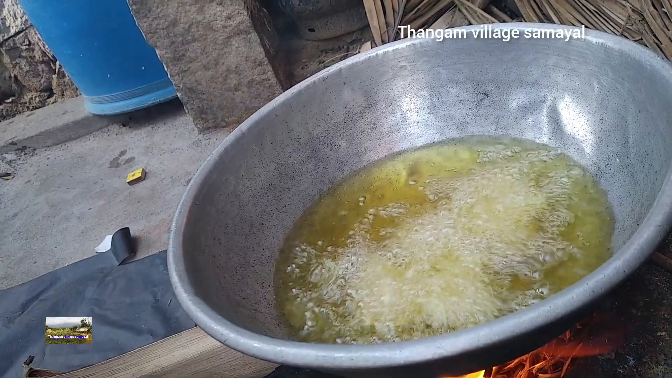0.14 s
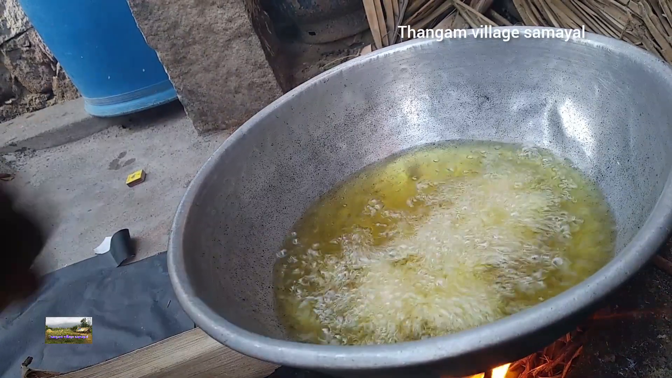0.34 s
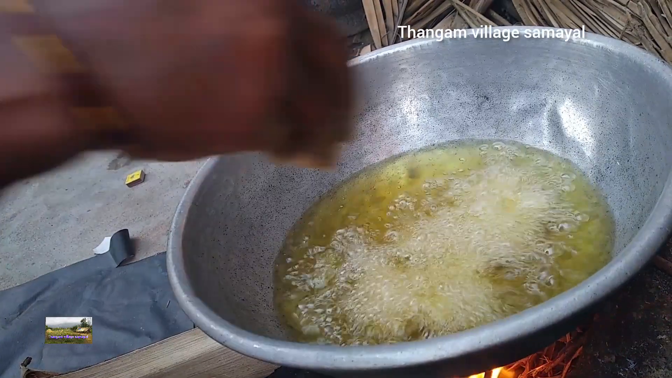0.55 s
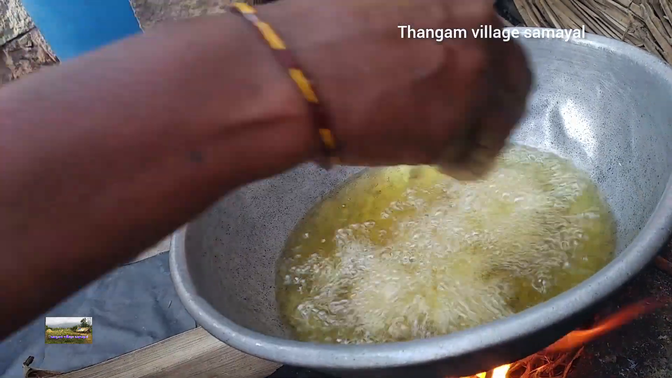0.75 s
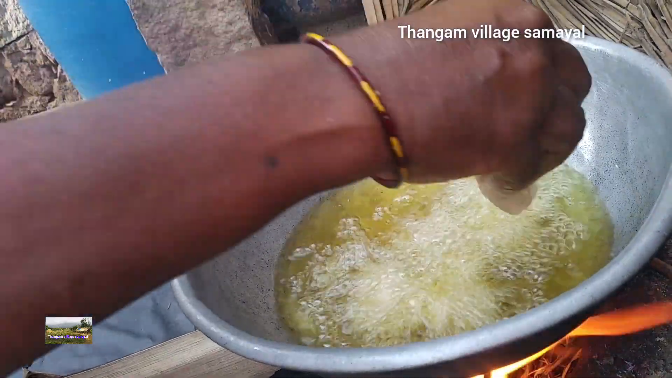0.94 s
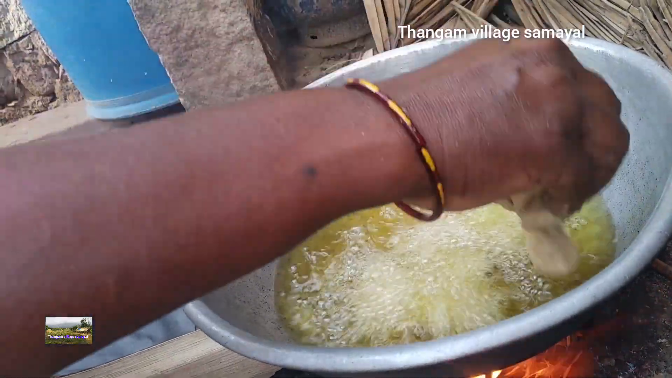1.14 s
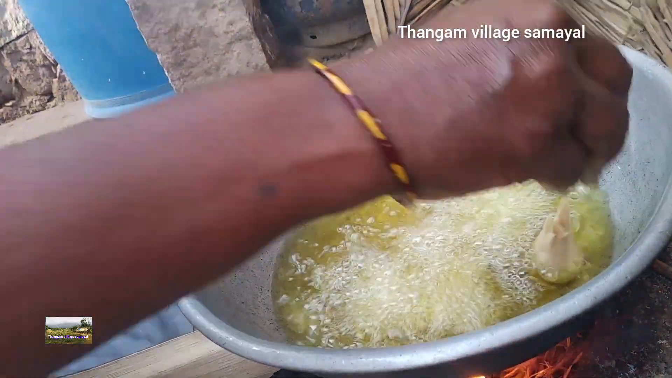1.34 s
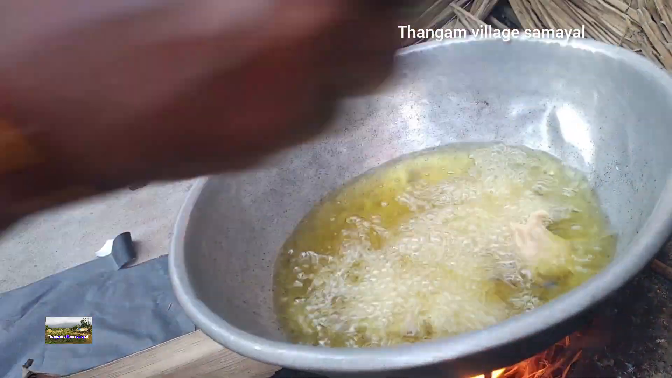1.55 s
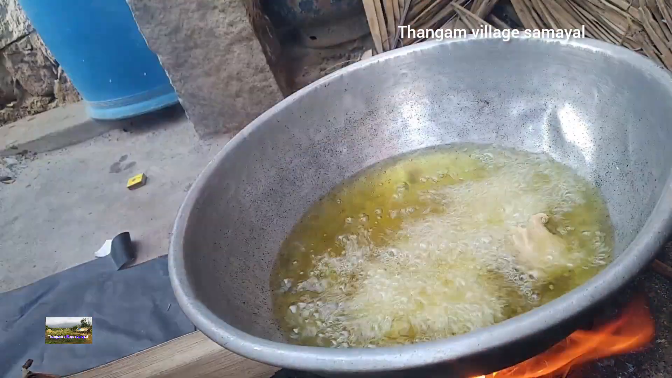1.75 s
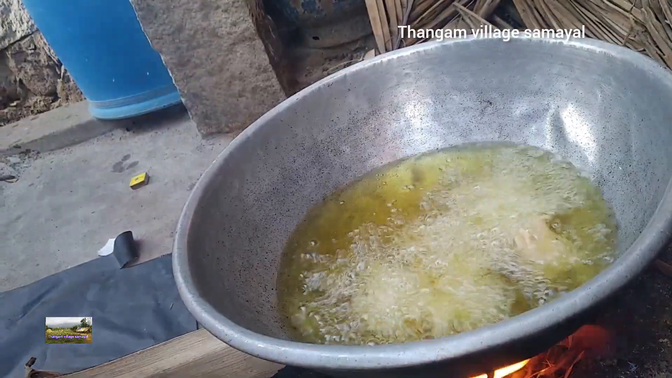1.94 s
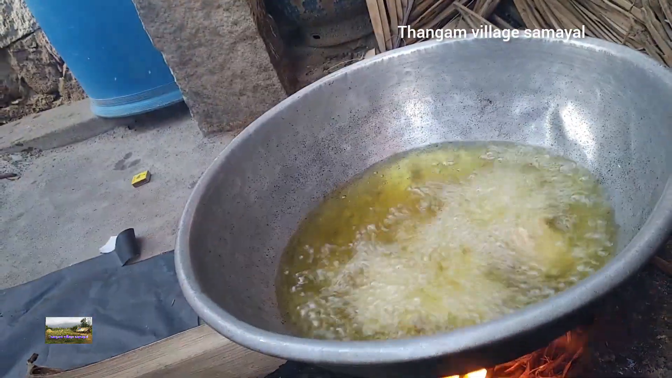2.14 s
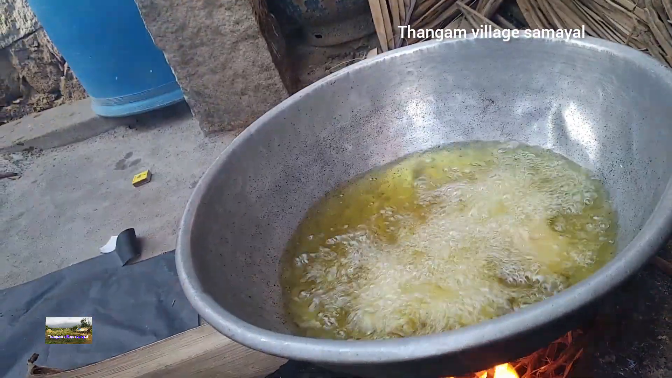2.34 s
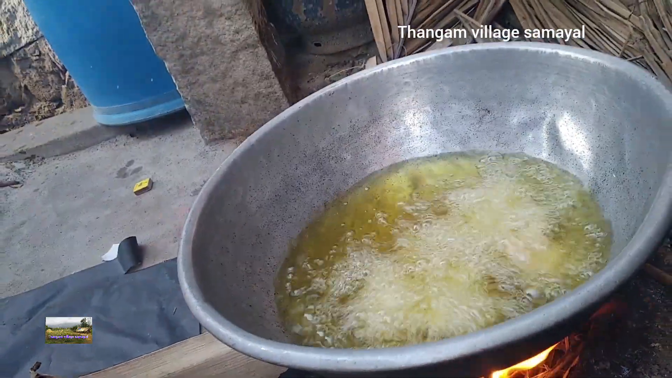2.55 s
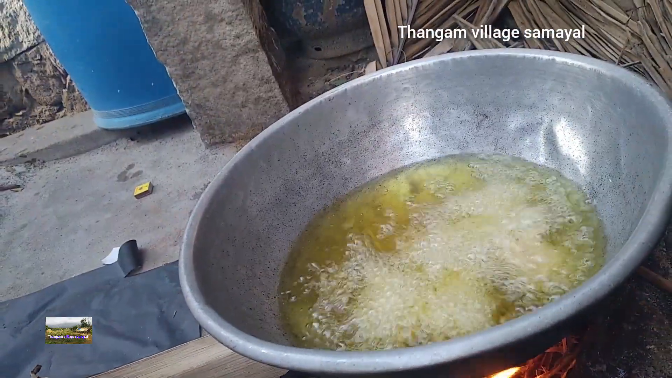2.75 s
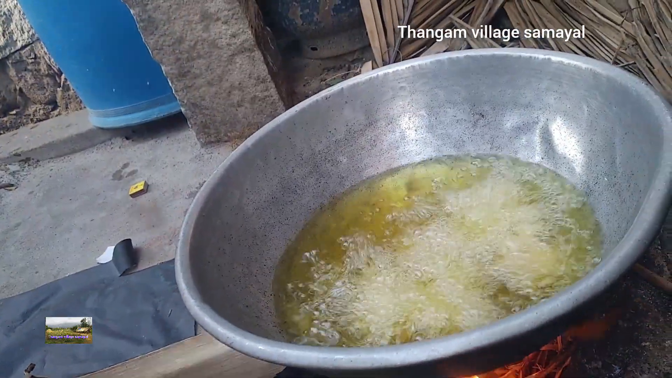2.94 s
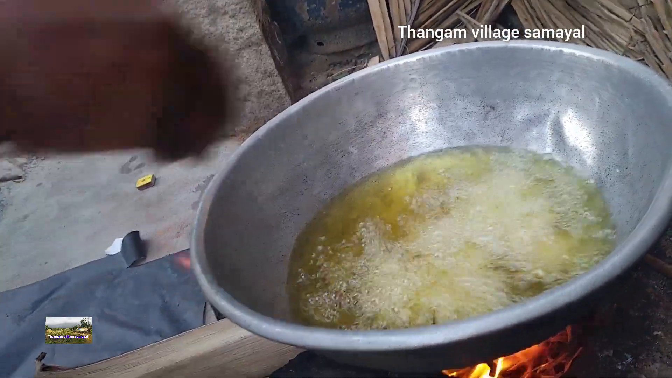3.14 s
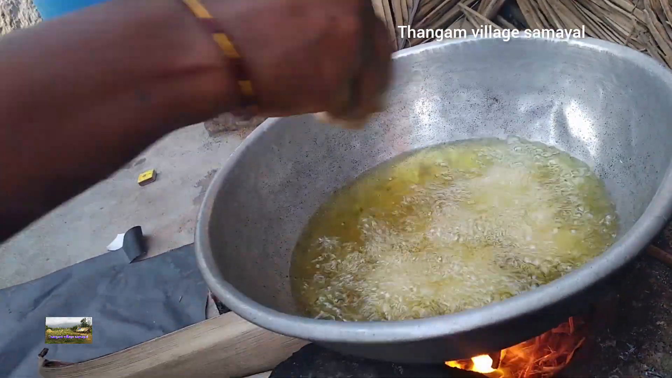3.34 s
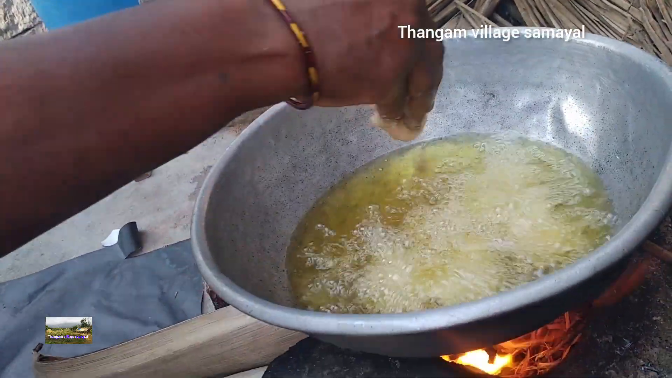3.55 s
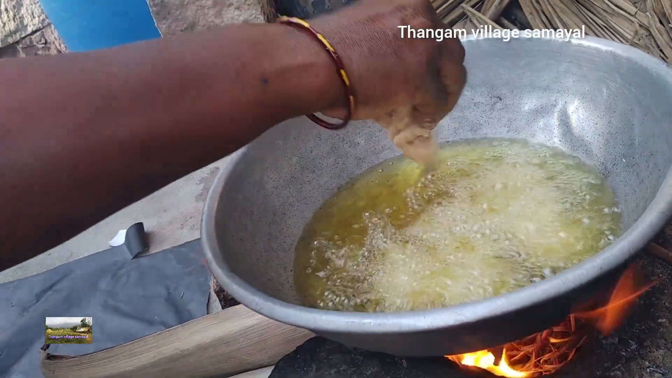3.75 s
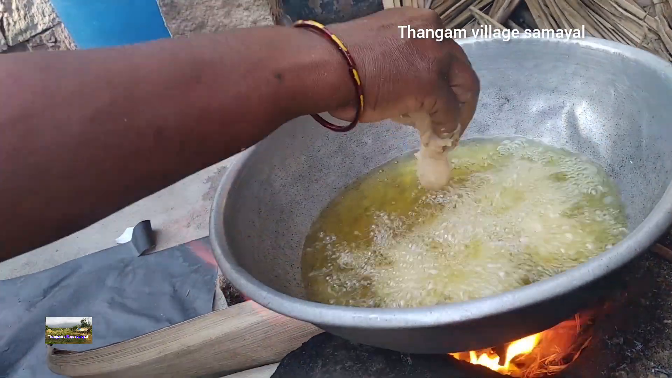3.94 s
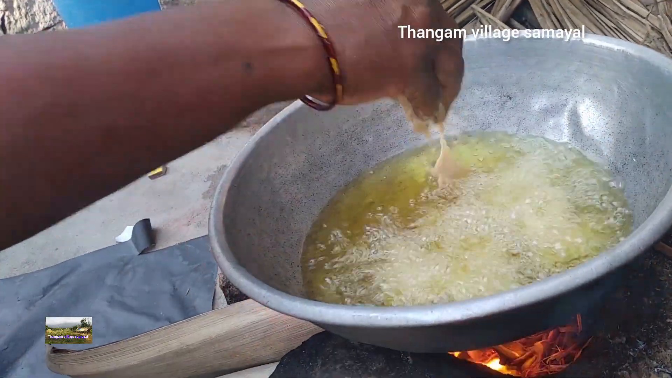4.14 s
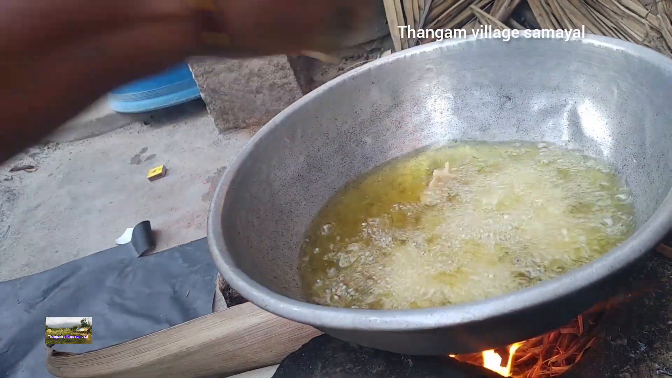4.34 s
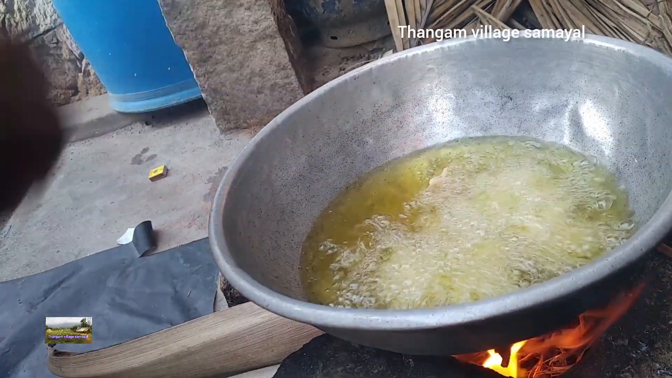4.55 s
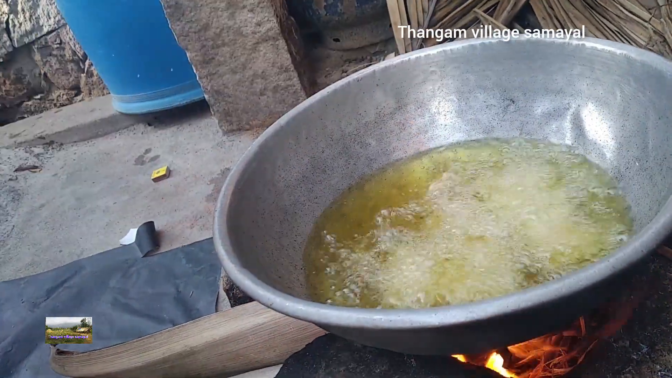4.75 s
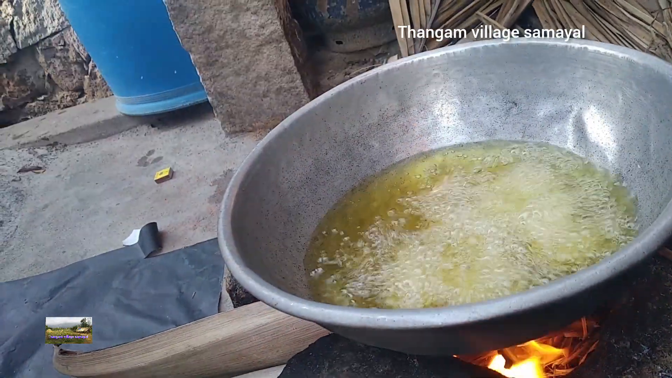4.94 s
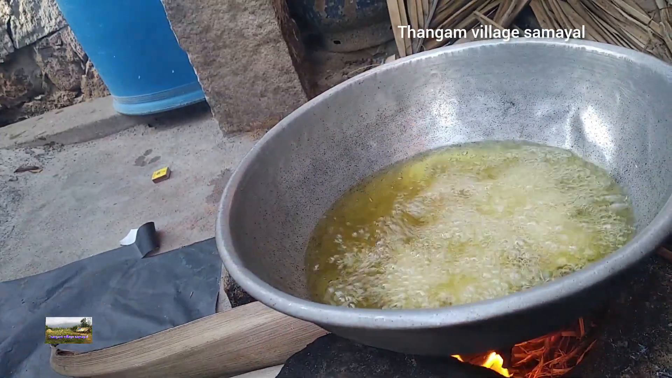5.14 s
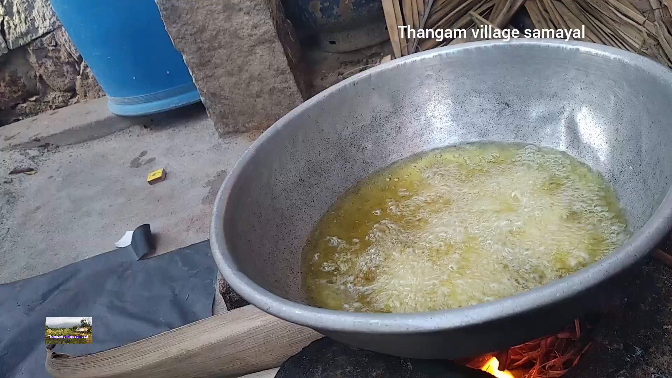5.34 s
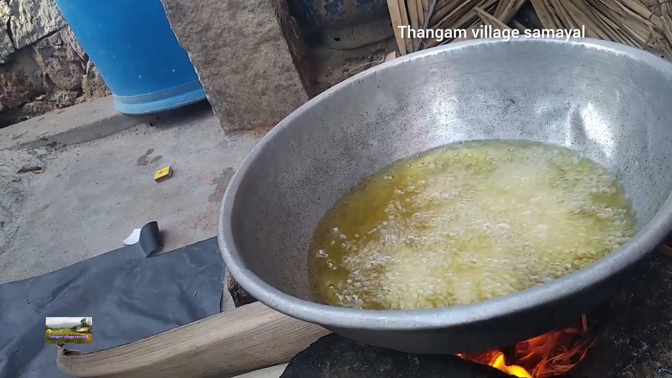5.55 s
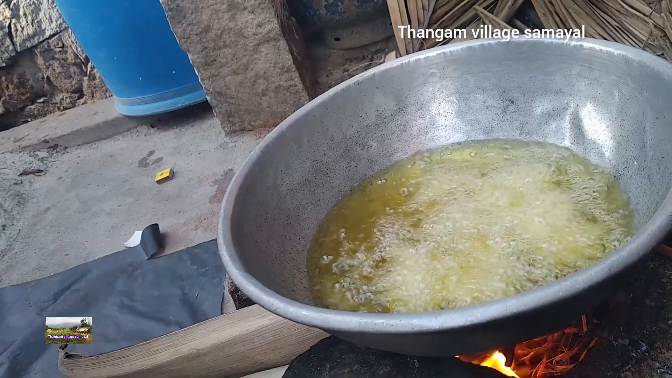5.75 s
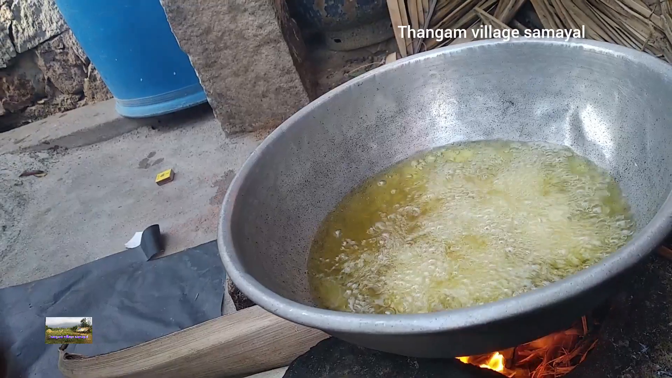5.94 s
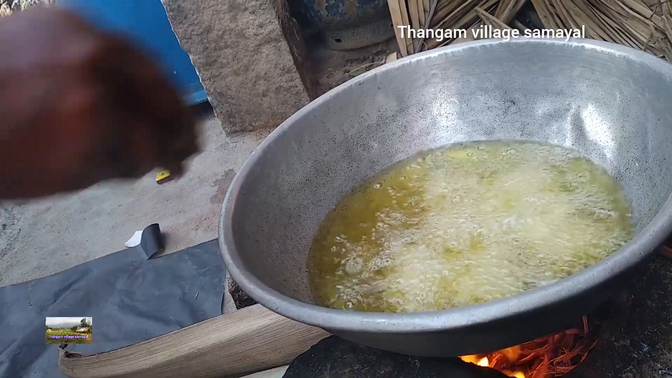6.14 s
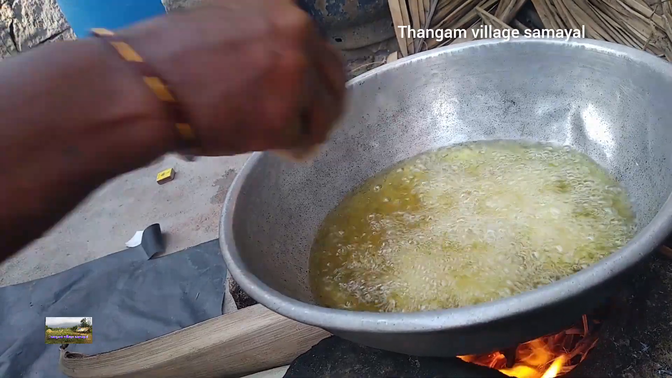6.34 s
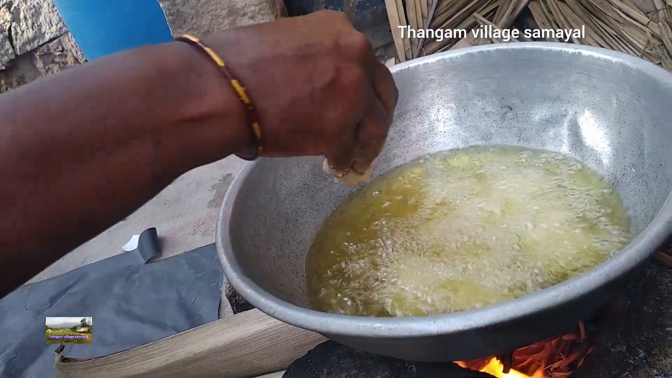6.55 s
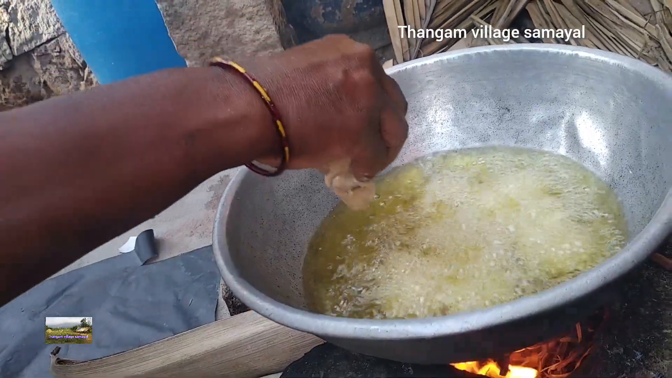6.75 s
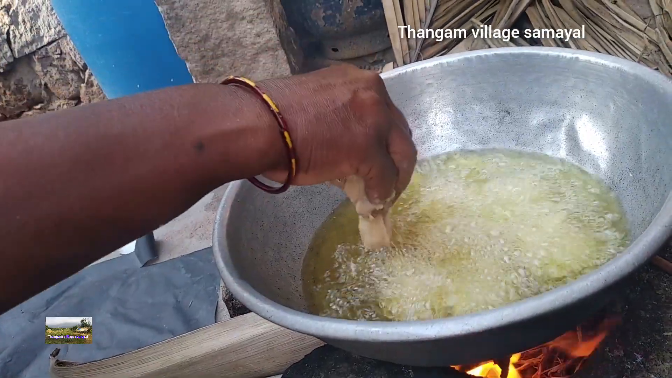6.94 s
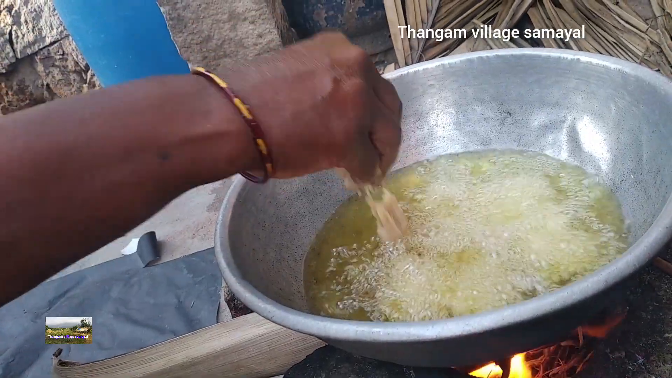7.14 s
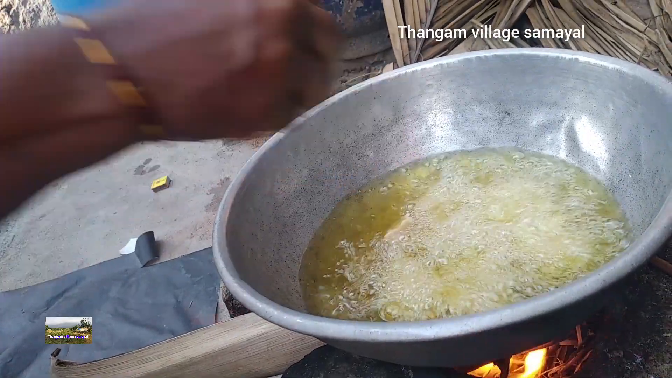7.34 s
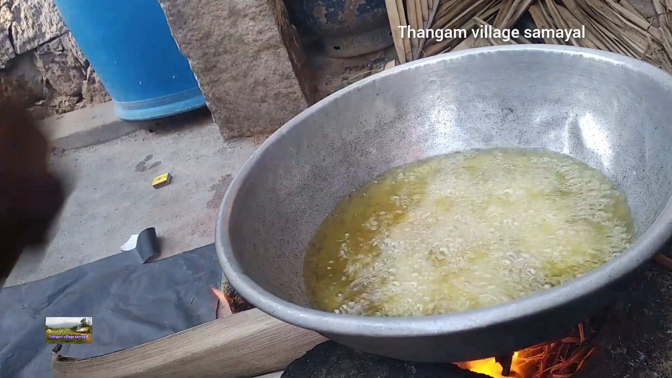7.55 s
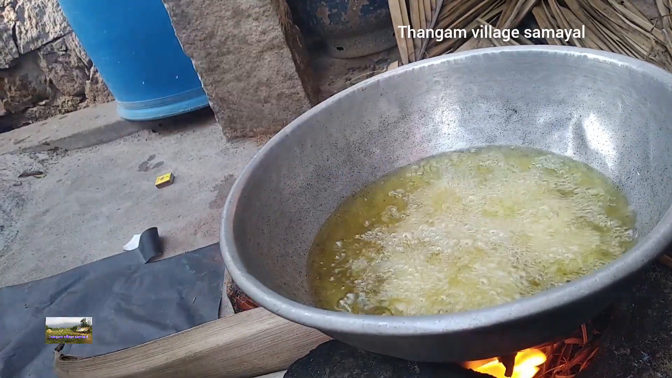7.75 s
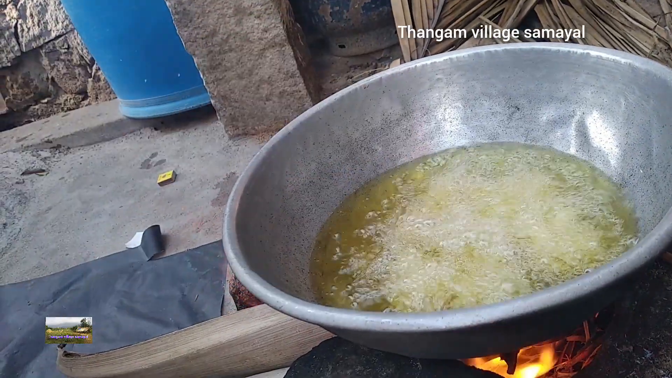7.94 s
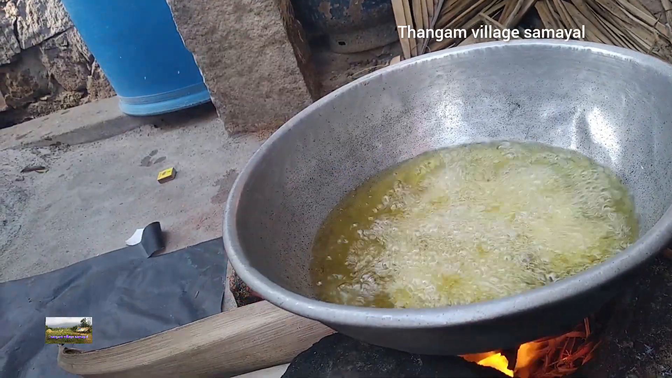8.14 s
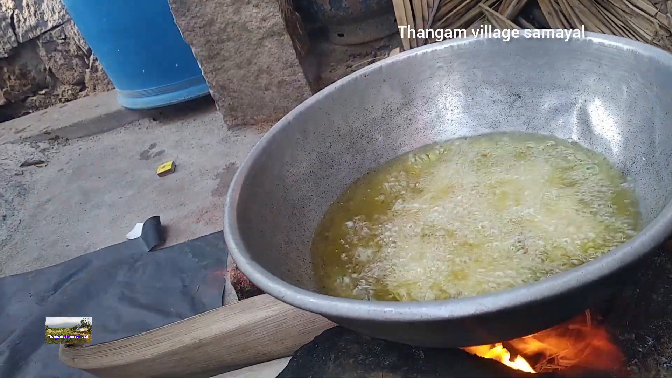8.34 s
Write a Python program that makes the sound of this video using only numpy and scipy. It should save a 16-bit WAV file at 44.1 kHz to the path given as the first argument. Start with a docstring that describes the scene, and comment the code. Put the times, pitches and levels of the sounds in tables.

```python
"""Batter balls deep-fry in a wide aluminium pan over an outdoor wood fire.
From the start: bubble bursts fizz, sizzle and crackle through the pan's resonances; low noise churns and
glugs, plops ring, noise rushes make steam spurts. Then faint sine hums, a far bird's pulsed caw at 0.4 s,
coarser spits, and narrow hisses that glide in pitch. Fresh batter flares at 1.2, 4.1 and 7.2 s, bringing its
own bubbles; from 1.8 s soft noise puffs bump the microphone; at 5.1 s a piece of firewood knocks."""
import sys
import numpy as np
from scipy import signal
from scipy.fft import rfft, irfft, next_fast_len
from scipy.io import wavfile
from scipy.ndimage import map_coordinates

SR = 44100
rng = np.random.default_rng(int(sys.argv[2]) if len(sys.argv) > 2 else 0)


def digitize_waveform(pressure):
    """Quantize a signal to 16-bit integers and store it at the path in sys.argv[1].

    Rows of a 2-D input are taken as channels; values are limited to [-1, 1].
    """
    field = np.atleast_2d(pressure).T
    bounded = np.clip(field, -1, 1)
    quanta = np.round(bounded * 32767).astype(np.int16)
    wavfile.write(sys.argv[1], SR, quanta)


N = 369999
TIME = np.arange(N) / SR
SIZE = next_fast_len(N + SR // 4, real=True) // 2 * 2   # padded FFT length, even
BIN_HZ = np.maximum(np.arange(SIZE // 2 + 1) * SR / SIZE, 1)


def from_db(db):
    """Decibels to gain."""
    return np.exp(np.asarray(db) * (np.log(10) / 20))


def rms_one(x):
    """Scale to rms 1."""
    return x / np.sqrt(np.mean(x ** 2) + 1e-20)


def level_curve(rows):
    """(t/s, level/dB) points interpolated at every sample."""
    s, db = np.transpose(rows)
    return np.interp(TIME, s, db)


def drift(rate_hz):
    """Random wander of spread about 1, with rate_hz new targets a second."""
    targets = rng.standard_normal(4096)
    return 1.2 * np.interp(TIME * rate_hz, np.arange(len(targets)), targets)


def balance(pan_db):
    """Left and right gains, pan_db apart; negative leans right."""
    return from_db([[pan_db / 2], [-pan_db / 2]])


def colour(x, spectrum):
    """Causal (minimum-phase) filter with this spectrum, by folding the cepstrum."""
    hz, db = np.transpose(spectrum)
    log_gain = np.log(from_db(np.interp(np.log(BIN_HZ), np.log(hz), db)))
    cepstrum = irfft(log_gain)
    cepstrum[1:SIZE // 2] *= 2
    cepstrum[SIZE // 2 + 1:] = 0
    response = np.exp(rfft(cepstrum))
    return irfft(rfft(x, SIZE) * response)[..., :N]


# resonances and dips of pan and oil: f/Hz, width/Hz, boost/dB
PAN = [(172,21,12), (443,204,-40), (561.7,24.4,23), (985,67,-28), (1117.4,24.5,18), (1255,16,-17),
       (1348,26,9), (1610,33,11.5), (1822,27.4,14.5), (2132,49,-13), (2144.4,14.4,19.5), (2270,120,-24),
       (2462,21,7.5), (2752,23,12), (3032,12,6), (3210,19,8.5), (3440,27,13), (3790,51,3), (4004,72,13.5),
       (4097,17.6,8.5), (4070,160,3.5), (4550,310,-0.5), (4990,77,7), (5380,31,8.5), (5755,33,12),
       (6185,130,8.5), (6490,45,7), (7170,114,6), (8680,130,5.5), (9260,76,5.5), (9050,66,-0.5),
       (9705,55,5.5), (10900,220,-14.5), (12300,72,-7), (12530,91,3.5)]


def pan_ring(x):
    """Pan and oil lift narrow bands, which ring on briefly, and dip others: a chain of peaking filters."""
    sections = []
    for hz, width_hz, boost_db in PAN:
        a = np.pi * width_hz / SR
        c = -2 * np.cos(2 * np.pi * hz / SR)
        g = from_db(boost_db)
        sections.append(np.array([1 + a * g, c, 1 - a * g, 1 + a, c, 1 - a]) / (1 + a))
    return signal.sosfilt(sections, x + 1e-18)


def place(pair, alike, pan_db):
    """Two unrelated signals become left and right with a given likeness (0 to .99) and balance."""
    side = np.sqrt((1 - alike) / (1 + alike)) * pair[1]
    left, right = from_db(pan_db / 2), from_db(-pan_db / 2)
    return np.array([left * (pair[0] + side), right * (pair[0] - side)]) * 2 / (left + right)


def bursts(per_s, spread_db):
    """Bubbles burst at random instants and sizes, with independent strengths in the two signals."""
    born = rng.random(N) < per_s / SR
    sizes = from_db(spread_db * np.minimum(rng.exponential(1, N), 5))
    return rms_one(born * sizes * rng.standard_normal((2, N)))


def bubbling(spectrum, per_s, spread_db):
    """Random bursts, coloured by bubble size and by the pan."""
    return rms_one(pan_ring(colour(bursts(per_s, spread_db), spectrum)))


def patchy(x, depth_db, rate_hz, lowest_hz, count):
    """Bubbles of like size come in clusters, so each half-octave flickers on its own."""
    out, rest = 0, x
    for hz in np.minimum(lowest_hz * 2 ** (np.arange(count) / 2), SR / np.pi):
        low = signal.sosfiltfilt(signal.butter(4, hz, fs=SR, output="sos"), rest, padtype="even")
        out = out + low * from_db(depth_db * drift(rate_hz))
        rest = rest - low
    return rms_one(out + rest * from_db(depth_db * drift(rate_hz)))


def clumps(depth_db=1.5, rate_hz=170):
    """Gain of bubbles that set each other off, in clumps of a few thousandths of a second."""
    return rms_one(from_db(depth_db * drift(rate_hz)))


def swell(s, length_s):
    """Bell-shaped rise and fall, length_s wide at half power, and the samples it covers."""
    near = slice(max(int((s - 3 * length_s) * SR), 0), int((s + 3 * length_s) * SR))
    return near, 2 ** (-2 * ((TIME[near] - s) / length_s) ** 2)


def rush(grains, s, length_s, hz, band_ratio):
    """A dense rush around one pitch that swells and stops, and the samples it covers."""
    near, bell = swell(s, length_s)
    band = signal.butter(2, [hz / band_ratio, hz * band_ratio], "band", fs=SR, output="sos")
    return near, rms_one(signal.sosfilt(band, grains[:, near])) * bell


def ring(clicks, hz, t60_s):
    """A unit click sets a decaying sine of height about 1 ringing."""
    r, w = from_db(-60 / (t60_s * SR)), 2 * np.pi * hz / SR
    return signal.lfilter([0, np.sin(w)], [1, -2 * r * np.cos(w), r * r], clicks + 1e-18)


def boil_off(s, db, rise_s, fade_db_per_s):
    """Gain of a fresh lump's boiling: it rises as the lump sinks in, then fades as a crust forms."""
    fade_db = fade_db_per_s * np.maximum(TIME - s - rise_s, 0)
    return np.clip((TIME - s) / rise_s, 0, 1) * from_db(db - fade_db)


def hand_shade(lead_s=0.033, over_s=0.38, depth_db=-4.5):
    """Level change/dB as the hand screens the pan just before each lump goes in."""
    db = np.zeros(N)
    for s, *_ in DROPS:
        near, bell = swell(s - lead_s, over_s)
        db[near] += depth_db * bell
    return db


# vigour of the fizzing crusts, before shade and trim: t/s, level/dB
FIZZ = [(0,-50), (.17,-49), (.35,-48.5), (.7,-51), (1.1,-46), (1.42,-44.5), (1.8,-55), (2.27,-55.5),
        (2.48,-45.5), (2.72,-45), (2.97,-47.5), (3.22,-46.5), (3.36,-48), (3.55,-47.5), (3.85,-45.5),
        (4.0,-47), (4.25,-50.5), (4.7,-50), (5.0,-48.5), (5.42,-48.5), (5.62,-46), (5.97,-52), (6.25,-47),
        (6.46,-54), (6.6,-48.5), (6.73,-53.5), (6.88,-46.5), (7.1,-50), (7.35,-50.5), (7.7,-55),
        (8.03,-47.5), (8.2,-53), (8.39,-52.5)]
# fizz spectrum before the pan: f/Hz, relative level/dB per Hz
FIZZ_COLOUR = [(1000,-81), (3000,-27), (5000,-25), (7600,-5), (8600,3.5), (9500,3), (10400,2), (10900,-2),
               (11400,0.5), (12600,-1.5), (14000,-7.5), (15500,-11.5)]
PAN_PER_DB = 0.57   # left-right shift/dB per dB of level: surges move towards the middle


def fizz(trim_db=-0.96, per_s=22000, spread_db=-1.0, patch_db=2.6, alike=0.15,
         usual_db=-54.5, usual_pan_db=-14.5, fresh_pan_db=-1.5):
    """Tiny bubbles burst in clumps on the crusts, and on each fresh lump."""
    db = level_curve(FIZZ) + hand_shade()
    old, new = (patchy(bubbling(FIZZ_COLOUR, per_s, spread_db), patch_db, 65, 5060, count=3)
                for _ in range(2))
    crusts = place(old, alike, usual_pan_db + PAN_PER_DB * (db - usual_db)) * from_db(db)
    fresh_gain = sum(boil_off(s, fine_db, rise_s, fade) for s, _, rise_s, fade, _, fine_db in DROPS)
    fresh = place(new, alike, fresh_pan_db) * fresh_gain
    return (crusts + fresh) * from_db(trim_db) * clumps()


# coarse sizzle of the balls already frying, before shade: t/s, level/dB
WET = [(0,-54), (2.3,-53.5), (3.3,-56), (5.3,-54), (6.8,-56), (8.39,-54.5)]
# its spectrum before the pan: f/Hz, relative level/dB per Hz
WET_COLOUR = [(600,-30), (1500,-32), (2300,-15.5), (3100,-2.5), (3900,-4), (4400,-5), (5000,-5),
              (6000,-5.5), (7300,-4), (9000,-4), (12000,-7.5), (15500,-41)]


def wet_sizzle(per_s=12000, spread_db=0.0, patch_db=3.0, alike=0.29, pan_db=-2):
    """Water boiling out of the balls makes larger, lower bubbles."""
    grains = patchy(bubbling(WET_COLOUR, per_s, spread_db), patch_db, 45, 2730, count=4)
    return place(grains, alike, pan_db) * from_db(level_curve(WET) + hand_shade())


def crackles(trim_db=-11, per_s=900, spread_db=-0.7, ring_cycles=24, lowest_hz=2800, highest_hz=10000,
             tilt_db_per_octave=14.0, fresh_db=-8, alike=0.22, pan_db=-5):
    """Single bubbles open above the fizz, each a short, soft-edged ping at the pitch of its size."""
    clicks, size_class, out = bursts(per_s, spread_db), rng.integers(0, 24, N), 0
    for k, hz in enumerate(np.geomspace(lowest_hz, highest_hz, 24)):
        t60_s = ring_cycles / hz
        pings = ring(ring(clicks * (size_class == k), hz, t60_s), hz, t60_s)   # twice softens the edge
        out = out + rms_one(pings) * from_db(tilt_db_per_octave * np.log2(hz / lowest_hz))
    crusts = from_db(level_curve(FIZZ) + hand_shade())
    fresh = sum(boil_off(s, db + fresh_db, rise_s, fade) for s, db, rise_s, fade, _, _ in DROPS)
    return place(rms_one(pan_ring(out)), alike, pan_db) * (crusts + fresh) * from_db(trim_db)


CHURN_ALIKE, CHURN_PAN_DB = 0.97, -4
# how hard the oil churns: t/s, level/dB
CHURN = [(0,-68), (3.2,-69.5), (4.5,-67), (5.6,-68.5), (6.4,-69.5), (8.39,-68.5)]
# churn spectrum before the pan: f/Hz, relative level/dB per Hz
CHURN_COLOUR = [(30,-48), (60,-44), (100,-16.5), (160,-6.5), (240,0.5), (400,-4), (700,-26), (1000,-15.5),
                (1600,-18), (2500,-10.5), (5000,-39.5)]


def churn(per_s=3000, spread_db=1.16, patch_db=5.0):
    """Big bubbles heave under the surface and set the body of oil murmuring."""
    grains = patchy(bubbling(CHURN_COLOUR, per_s, spread_db), patch_db, 22, 186, count=7)
    return place(grains * from_db(level_curve(CHURN)), CHURN_ALIKE, CHURN_PAN_DB)


def plops(level_db=-78.0, per_s=170, spread_db=1.0, ring_cycles=32, lowest_hz=250, highest_hz=880,
          tilt_db_per_octave=-6.0, pan_db=-9.0):
    """Single large bubbles swell and ring softly under the oil, each at the pitch of its size."""
    clicks, size_class, out = bursts(per_s, spread_db)[0], rng.integers(0, 24, N), 0
    for k, hz in enumerate(np.geomspace(lowest_hz, highest_hz, 24)):
        r, w = np.exp(-np.log(1000) * hz / (ring_cycles * SR)), 2 * np.pi * hz / SR
        resonance = [1, 0, -1, 1, -2 * r * np.cos(w), r * r]
        excitation = clicks * (size_class == k) + 1e-12 * np.sin(w * np.arange(N))   # never quite silent
        tone = signal.sosfilt([resonance, resonance], excitation)   # twice: swells before it decays
        out = out + rms_one(tone) * from_db(tilt_db_per_octave * np.log2(hz / lowest_hz))
    return rms_one(out) * from_db(level_db) * balance(pan_db)


# biggest glugs of the oil: t/s, level/dB, length/s, f/Hz
GLUGS = [(.04,-62,0.078,172), (0.566,-62.5,0.13,175), (0.832,-67.5,0.08,181), (3.487,-62.5,0.072,172),
         (3.917,-62.5,0.076,172), (4.26,-64.5,0.09,178), (4.24,-67.5,0.079,285), (4.507,-66,0.14,290),
         (4.574,-60.5,0.072,173.5), (4.7,-66,0.036,180), (5.533,-65,0.064,179), (5.544,-70,0.093,324),
         (5.53,-71,.07,496), (5.57,-74,0.049,780), (6.678,-64.5,0.047,176), (8.184,-65.5,.095,187)]


def glugs():
    """Louder glugs of the churning oil: narrow low bands of noise swell and stop."""
    white, out = rng.standard_normal((2, N)), np.zeros((2, N))
    for s, db, length_s, hz in GLUGS:
        near, sound = rush(white, s, length_s, hz, band_ratio=1.075)
        out[:, near] += sound * from_db(db)
    return place(out, CHURN_ALIKE, CHURN_PAN_DB)


# strongest steam spurts from the crusts, before trim and pan: t/s, level/dB, length/s, centre f/Hz
SPURTS = [(0.1,-44,0.012,10800), (0.165,-43,0.022,11200), (0.484,-44.5,.01,9650), (0.624,-39.5,0.015,8900),
          (0.792,-43,0.019,11500), (.966,-40,0.01,9600), (1.065,-38,0.015,10900), (1.226,-42.5,0.011,10900),
          (1.36,-43,.014,11200), (1.512,-51,0.016,12600), (1.761,-47.5,0.012,7840),
          (2.216,-46.5,0.0089,9500), (2.35,-52,0.041,9900), (2.416,-40.5,0.02,11500),
          (2.435,-40,0.019,9900), (2.483,-44,0.0076,12600), (2.522,-34.5,0.014,11700),
          (2.553,-38,0.048,9800), (2.66,-37.5,0.044,9300), (2.699,-39,0.011,9300), (2.728,-38,.009,9000),
          (2.752,-34.5,0.026,10500), (2.786,-41,.007,9200), (2.808,-40,0.014,10600), (2.905,-39,0.025,9500),
          (3.043,-42,0.037,9400), (3.153,-49,0.043,9500), (3.239,-39.5,0.02,9700), (3.277,-41.5,0.01,9700),
          (3.439,-41.5,0.017,10800), (3.515,-59,.02,9400), (3.63,-41.5,.018,11100),
          (3.69,-44.5,0.038,10200), (3.846,-51,.012,9700), (4.373,-46.5,0.028,10100),
          (4.408,-47,0.018,11500), (4.552,-43.5,0.028,10200), (4.808,-45,.022,10000),
          (5.074,-37.5,0.012,9800), (5.218,-48,0.013,9500), (5.267,-47,0.0098,9400), (5.4,-44,0.041,9700),
          (5.474,-46,0.0085,9300), (5.507,-45.5,.014,9200), (5.576,-43,0.0072,9300),
          (5.683,-42.5,0.031,9400), (5.769,-44,.012,9600), (5.83,-44,0.012,9500), (6.047,-48,0.013,9600),
          (6.153,-43,0.0078,8800), (6.324,-48,0.0082,9500), (6.658,-46,0.045,9700), (6.8,-42,0.014,9500),
          (7.34,-47,0.033,9600), (7.501,-47,0.013,9900), (7.631,-48,.012,10200), (7.794,-45,0.023,10800),
          (7.903,-44.5,0.011,11000), (7.955,-46,.01,10100), (7.99,-48,0.027,10100),
          (8.178,-40.5,0.012,10900), (8.238,-48,0.011,9500)]


def small_spurts(per_s=7.9, length_s=0.0076, above_fizz_db=-7.5, centre_hz=9400, pitch_scatter=0.068):
    """Weak spurts at random times, following the vigour of the fizz; rows like SPURTS."""
    vigour_db = level_curve(FIZZ) + hand_shade()
    chance = rng.random((200, 3))
    rows = []
    for when, _, size in chance[chance[:, 1] < per_s * N / SR / len(chance)]:
        s = .1 + (N / SR - .2) * when
        hz = centre_hz * np.exp(pitch_scatter * (1 - 2 * size))
        rows.append((s, np.interp(s, TIME, vigour_db) + above_fizz_db, length_s, hz))
    return rows


def spurts(trim_db=-1.5, per_s=24000, spread_db=1.0, band_ratio=1.127, alike=0.35,
           usual_db=-37, usual_pan_db=-2):
    """Steam breaks through a crust in a rush of bubbles lasting hundredths of a second."""
    grains, out = bursts(per_s, spread_db), np.zeros((2, N))
    for s, db, length_s, hz in SPURTS + small_spurts():
        near, sound = rush(grains, s, length_s, hz, band_ratio)
        pan_db = usual_pan_db + PAN_PER_DB * (db - usual_db)
        out[:, near] += place(sound, alike, pan_db) * from_db(db + trim_db)
    return pan_ring(out)


# faint low hums: start t/s, length/s, f/Hz, level/dB
HUMS = [(0.23,0.35,291,-69), (0.683,0.53,225,-69), (1.098,0.38,265.6,-76), (1.524,0.35,414,-77.5),
        (2.03,0.33,223,-70.5), (2.2,0.22,281.5,-71.5), (2.63,0.29,279.5,-70), (5.741,0.19,260,-64.5)]


def hums(waver_hz=3, pan_db=-4):
    """Soft, slightly wavering low sine tones that come and go."""
    out, waver = np.zeros(N), waver_hz * drift(25)
    for start_s, length_s, hz, db in HUMS:
        near = slice(int(start_s * SR), int((start_s + length_s) * SR))
        tone = np.sin(2 * np.pi * np.cumsum(hz + waver[near]) / SR)
        out[near] += from_db(db) * np.sqrt(2 * np.hanning(len(tone))) * tone
    return out * balance(pan_db)


# the bird's throat: f/Hz, relative level/dB
CAW_COLOUR = [(100,-74), (450,-21), (750,-10), (920,-12.5), (1080,-1), (1370,-4), (1550,-7), (1850,-15),
              (2300,-40), (4000,-56)]


def caw(start_s=.38, length_s=.19, level_db=-62, end_hz=421.4, arch_hz=46, jitter=0.008, rasp=0.1,
        rasp_rate_hz=600, flutter_db=2, flutter_rate_hz=45, blur_s=0.031, pan_db=-2):
    """A far bird's uneven throat pulses, pitched at first, breaking into a rasp, blurred by echoes."""
    along = np.clip((TIME - start_s) / length_s, 0, 1)
    arch = np.abs(np.sin(np.pi * along))
    hz = (end_hz + arch_hz * arch) * (1 + (jitter + rasp * along ** 2) * drift(rasp_rate_hz))
    pulses = np.diff(np.floor(np.cumsum(hz) / SR), prepend=0)
    loudness = arch ** 0.38 * from_db(level_db + flutter_db * drift(flutter_rate_hz))
    call = rms_one(colour(pulses, CAW_COLOUR)) * loudness
    echoes = rng.standard_normal(SR // 4) * np.exp(-TIME[:SR // 4] / blur_s)
    echoed = signal.fftconvolve(call, echoes / np.linalg.norm(echoes))[:N]
    return (call + echoed) / np.sqrt(2) * balance(pan_db)


# wet batter spits, before trim and pan: t/s, level/dB, length/s, centre f/Hz
SPITS = [(0.63,-52,0.023,6140), (0.704,-49,0.024,5800), (1.309,-32,0.013,6150), (1.277,-53,0.065,3880),
         (1.335,-41.5,.02,6100), (1.38,-49,0.044,4000), (1.395,-42,0.033,5100), (1.421,-36.5,0.019,4280),
         (1.42,-34.5,0.019,7650), (1.432,-55,0.18,3400), (1.47,-39.5,0.016,6440), (1.537,-41,.01,5570),
         (1.557,-37.5,0.014,4240), (1.558,-37.5,0.027,6600), (1.64,-61,0.059,2420),
         (1.574,-35.5,0.0091,5360), (1.646,-47,.012,4560), (1.651,-45,0.034,5740), (1.713,-55,0.022,4100),
         (1.876,-48,0.02,4470), (2.51,-43,0.01,5950), (2.677,-38,0.027,6000), (4.18,-52.5,0.13,3150),
         (4.235,-49,0.037,4600), (4.398,-53.5,0.052,4020), (4.407,-45,.014,6400), (4.45,-43,0.025,6700),
         (4.555,-54.5,0.029,3640), (6.462,-48,0.011,6030), (6.88,-58.5,0.033,3430), (7.219,-50,0.027,4150),
         (7.243,-44,0.0057,4530), (7.297,-55,0.028,4140), (7.423,-51.5,.16,4030), (7.683,-55.5,.2,4000),
         (7.483,-54,0.014,4000), (8.089,-52,0.025,4500)]


def spits(trim_db=-6.0, per_s=18000, spread_db=0.0, band_ratio=1.127, alike=.99, pan_db=-1):
    """Pockets of water in the batter flash to steam in a short, coarser rush."""
    grains, out = bursts(per_s, spread_db), np.zeros((2, N))
    for s, db, length_s, hz in SPITS:
        near, sound = rush(grains, s, length_s, hz, band_ratio)
        out[:, near] += sound * from_db(db + trim_db)
    return pan_ring(place(out, alike, pan_db))


# gliding hisses, level before trim: start t/s, end t/s, start f/Hz, middle f/Hz, end f/Hz, width/Hz, level/dB
SLIDES = [(0.914,1.33,7200,6500,5400,930,-52), (4.1,4.8,2167,2180,2400,40,-66),
          (5.85,6.3,2400,2180,1900,53,-75), (4.45,4.6,1200,1200,1200,100,-68.5),
          (4.661,5.038,1180,1300,2100,320,-72), (4.552,4.94,1820,1870,1760,62,-63),
          (4.7,4.9,1660,1700,1200,75,-67), (4.9,5.04,2000,1660,1300,83,-65),
          (5.81,5.98,1720,1790,1600,75,-65), (5.97,6.14,1820,1880,1600,45,-61.5),
          (6.13,6.28,2300,1700,2000,80,-67), (6.13,6.33,1570,1500,1550,52,-67.5),
          (5.956,6.165,1260,1330,1420,69,-72.5), (7.351,7.956,1332,1210,1200,270,-74)]


def sliding_hisses(trim_db=-1.5, pan_db=-2, waver_hz=12, rate_hz=35, flutter_db=2.0):
    """Narrow noise on a gliding carrier fades in, wavers and flutters, and fades out."""
    out, waver = np.zeros((2, N)), waver_hz * drift(rate_hz)
    flutter = from_db(flutter_db * drift(rate_hz))
    for start_s, end_s, from_hz, middle_hz, to_hz, width_hz, db in SLIDES:
        near = slice(int(start_s * SR), int(end_s * SR))
        along = np.linspace(0, 1, near.stop - near.start)
        white = rng.standard_normal((2, 2, SR))[..., :len(along)]
        real, imag = signal.sosfilt(signal.butter(2, width_hz / 2, fs=SR, output="sos"), white)
        glide = np.polyfit([0, .5, 1], [from_hz, middle_hz, to_hz], 2)
        phase = 2 * np.pi * np.cumsum(np.polyval(glide, along) + waver[near]) / SR
        hiss = rms_one((real * np.cos(phase) + imag * np.sin(phase)) * flutter[near])
        fade = np.abs(np.sin(np.pi * along)) ** .5
        out[:, near] += place(hiss * fade, 0.95, pan_db) * from_db(db + trim_db)
    return out


# lumps of batter entering the oil, levels before trims:
# t/s, level/dB, rise/s, fade/dB per s, big-bubble level/dB, fine-fizz level/dB
DROPS = [(1.24,-41.5,0.22,47,-54,-64), (4.088,-40.5,0.053,38,-60,-44), (7.189,-41,0.015,15,-91,-46)]
# small-bubble spectrum before the pan: f/Hz, relative level/dB per Hz
FLARE_COLOUR = [(600,-21), (1500,-41), (2300,-3.5), (3000,1.5), (3500,0), (4050,5), (4600,-3), (5200,8),
                (5800,11.5), (6600,9.5), (7200,9), (8000,5), (11000,-16), (15500,-70)]
# big-bubble spectrum before the pan: f/Hz, relative level/dB per Hz
BIG_COLOUR = [(300,-48), (700,-15.5), (1100,-18.5), (1400,-11), (2200,-5), (3000,-2), (5000,-7.5)]


def flares(trim_db=-3.5, per_s=11000, spread_db=0.0, patch_db=2.5, alike=0.92, pan_db=-1,
           big_fade_db_per_s=9):
    """Each fresh lump boils hard until a crust forms; its fewer big bubbles fade more slowly."""
    small_gain = sum(boil_off(s, db, rise_s, fade) for s, db, rise_s, fade, _, _ in DROPS)
    big_gain = sum(boil_off(s, big_db, rise_s, big_fade_db_per_s) for s, _, rise_s, _, big_db, _ in DROPS)
    small = patchy(bubbling(FLARE_COLOUR, per_s, spread_db), patch_db, 45, 3240, count=3) * clumps()
    big = bubbling(BIG_COLOUR, 2500, 0.9) * clumps()
    return place(small * small_gain + big * big_gain, alike, pan_db) * from_db(trim_db)


# puffs of air on the microphone, before trim: t/s, level/dB, length/s
PUFFS = [(1.769,-73,0.06), (4.225,-78,0.17), (6.97,-58,0.028), (7.304,-53.5,0.082), (7.58,-57,0.034),
         (8.33,-64,0.081)]
# puff spectrum: f/Hz, relative level/dB per Hz
PUFF_COLOUR = [(30,-45), (65,-27), (100,5.5), (135,3), (200,-11.5), (500,-58), (2000,-77)]


def puffs(trim_db=-2):
    """Moving air thumps softly on the microphone: low noise under bell-shaped swells."""
    push = np.zeros(N)
    for s, db, length_s in PUFFS:
        near, bell = swell(s, length_s)
        push[near] += from_db(db + trim_db) * bell
    return rms_one(colour(rng.standard_normal(N), PUFF_COLOUR)) * push


# what the wood rings with: f/Hz, relative level/dB, t60/s
KNOCK_MODES = [(924,-7.5,0.066), (1140,-12,.03), (1465,-1,0.045), (1700,-1,.025), (1730,-2,0.037),
               (1990,-1,0.022)]


def knock(at_s=5.058, level_db=-63, contact_s=0.016):
    """A piece of firewood shifts: a swell of scuffing noise rings its modes briefly."""
    near, bell = swell(at_s, contact_s)
    push = np.zeros(N)
    push[near] = rng.standard_normal(len(bell)) * bell
    wood = sum(ring(push, hz, t60_s) * from_db(db) * (-1) ** k
               for k, (hz, db, t60_s) in enumerate(KNOCK_MODES))
    return wood / np.std(wood[near]) * from_db(level_db)


def heave(x, ring_hz=4030, ring_width_hz=420, ring_db=-2, swell_db=2.0, sway_s=.00008, rate_hz=18):
    """The oil surface heaves: pitch wanders by a varying delay and the band at ring_hz swells and sinks."""
    edges_hz = [ring_hz - ring_width_hz / 2, ring_hz + ring_width_hz / 2]
    band = signal.sosfiltfilt(signal.butter(2, edges_hz, "band", fs=SR, output="sos"), x)
    swollen = x + band * (from_db(ring_db + swell_db * drift(rate_hz)) - 1)
    read_at = (TIME + sway_s * drift(rate_hz)) * SR
    return np.array([map_coordinates(side, [read_at], order=5, mode="mirror") for side in swollen])


def bowl_echoes(x, echo_db=-14, near_s=0.001295, far_s=.0031, sway_s=.00006, sway_rate_hz=3):
    """Near and far walls of the bowl reflect the sizzle; the paths shift as the balls float about."""
    out = x
    for delay_s in (near_s, far_s):
        late = TIME - delay_s - sway_s * drift(sway_rate_hz)
        out = out + from_db(echo_db) * np.array([np.interp(late, TIME, side) for side in x])
    return out / np.sqrt(1 + 2 * from_db(echo_db) ** 2)


def scene():
    """The pan close by and a little to the right, in open air."""
    surface = heave(fizz() + wet_sizzle() + flares() + spurts())
    sizzle = bowl_echoes(surface + spits() + crackles())
    oil = churn() + glugs() + plops()
    return sizzle + oil + hums() + caw() + sliding_hisses() + puffs() + knock()


def record(dry, narrow_from_hz=1700, narrow_to_hz=4400, narrow_db=-6, crossfeed_db=-18,
           crossfeed_hz=8800, crossfeed_s=256 / 48000, cutoff_hz=15480):
    """Midrange stereo narrows, left treble echoes faintly on the right, and the top is cut steeply."""
    band = signal.butter(6, [narrow_from_hz, narrow_to_hz], "band", fs=SR, output="sos")
    side = signal.sosfiltfilt(band, (dry[0] - dry[1]) / 2)
    heard = dry + (from_db(narrow_db) - 1) * np.array([side, -side])
    treble = signal.sosfiltfilt(signal.butter(6, crossfeed_hz, "high", fs=SR, output="sos"), heard[0])
    for k in (1, 2):
        late = map_coordinates(treble, [(TIME - k * crossfeed_s) * SR], order=3)
        heard[1] += from_db(crossfeed_db) / k * late
    return signal.sosfilt(signal.ellip(12, .2, 80, cutoff_hz, fs=SR, output="sos"), heard)


dry = scene()
out = record(dry)
digitize_waveform(out)
```